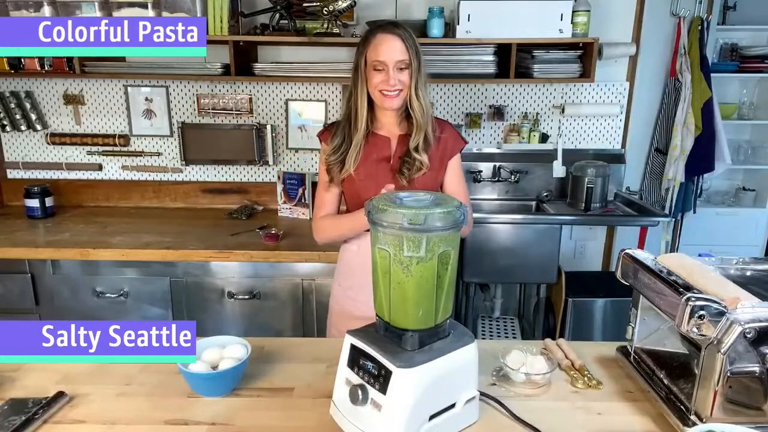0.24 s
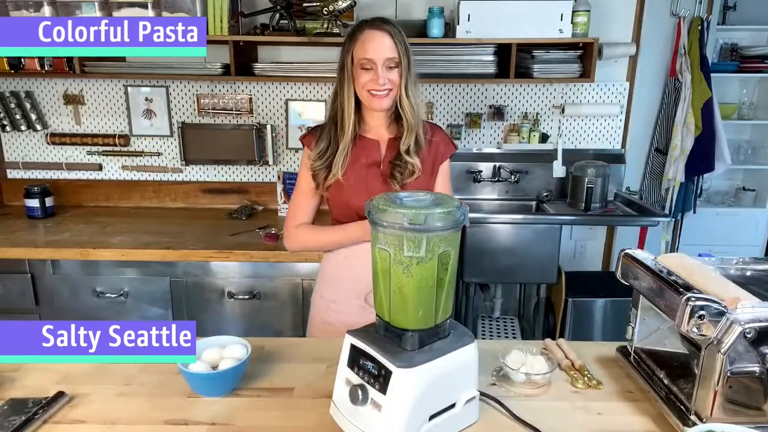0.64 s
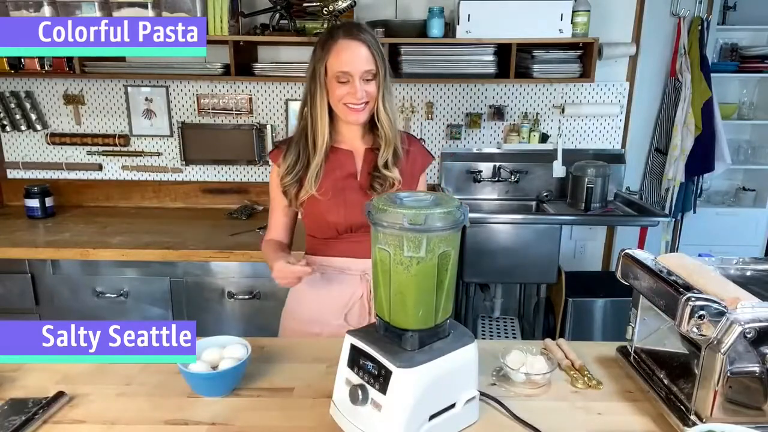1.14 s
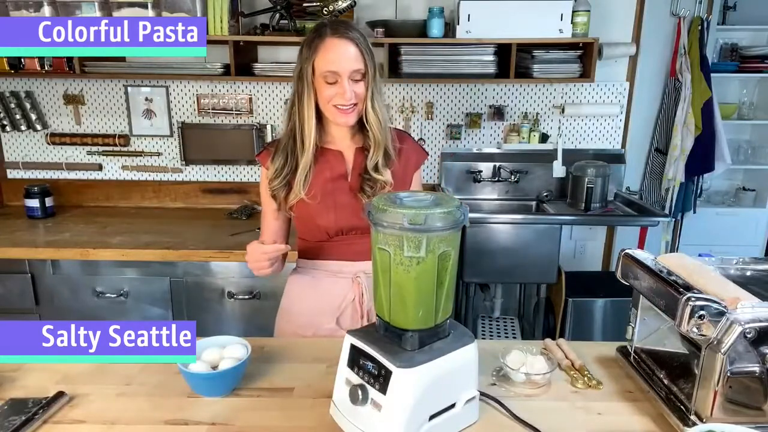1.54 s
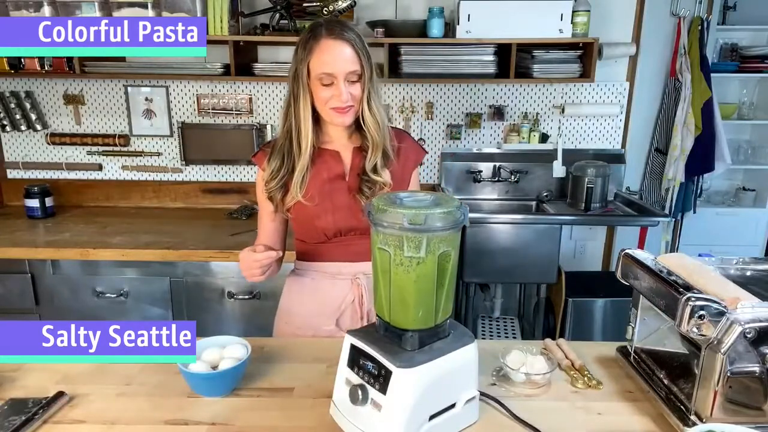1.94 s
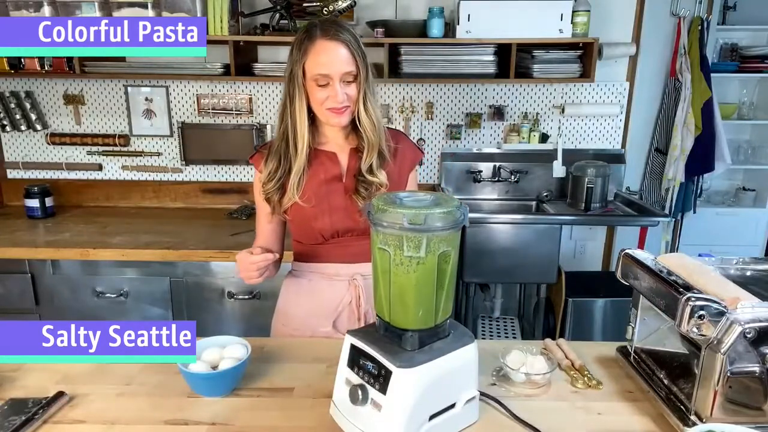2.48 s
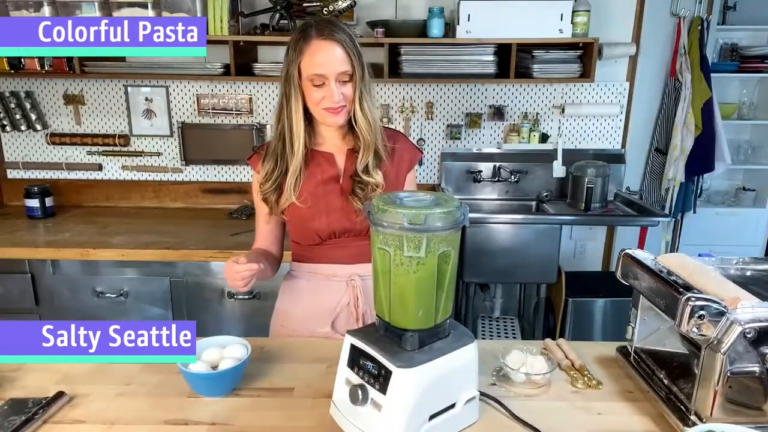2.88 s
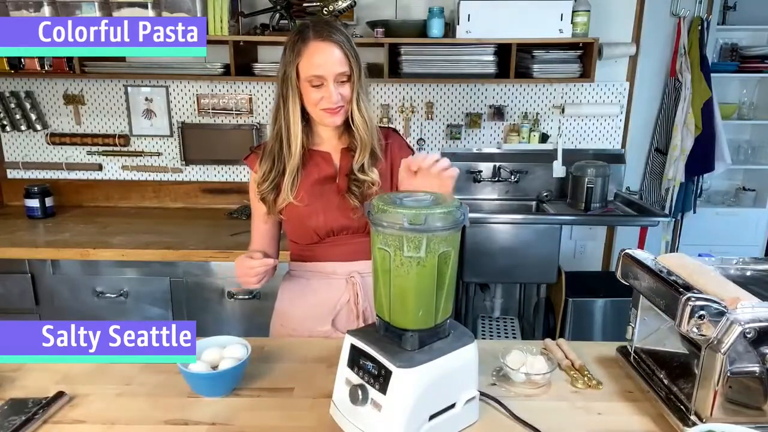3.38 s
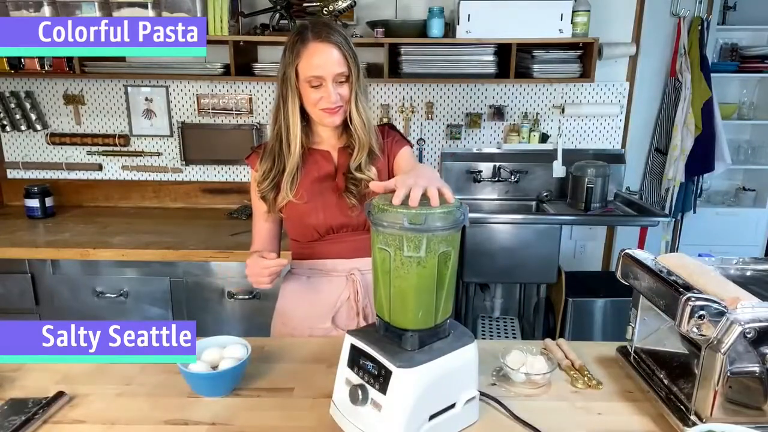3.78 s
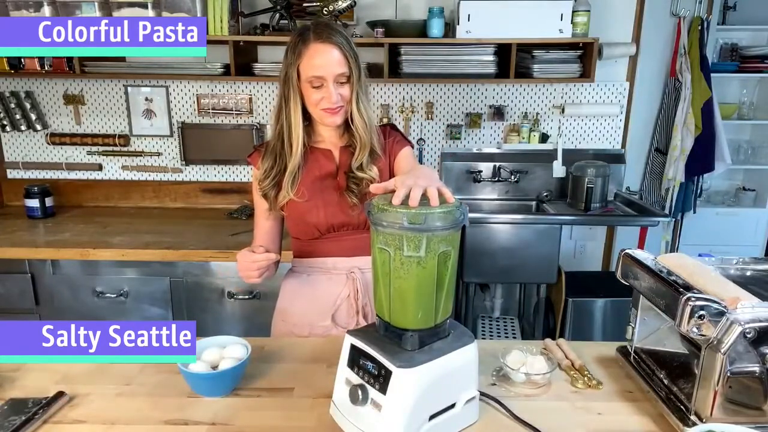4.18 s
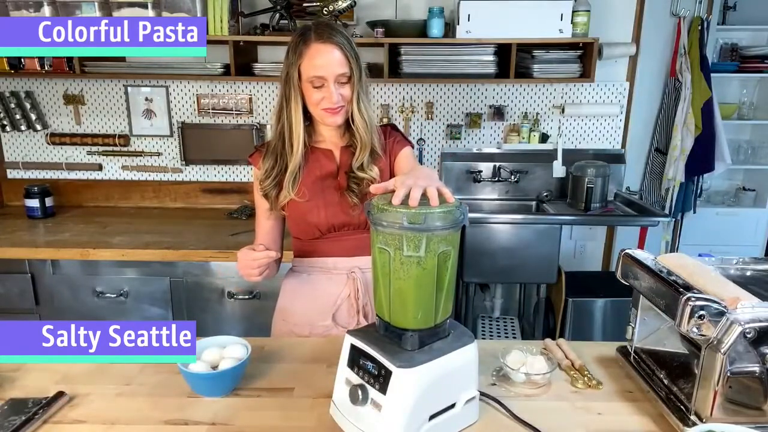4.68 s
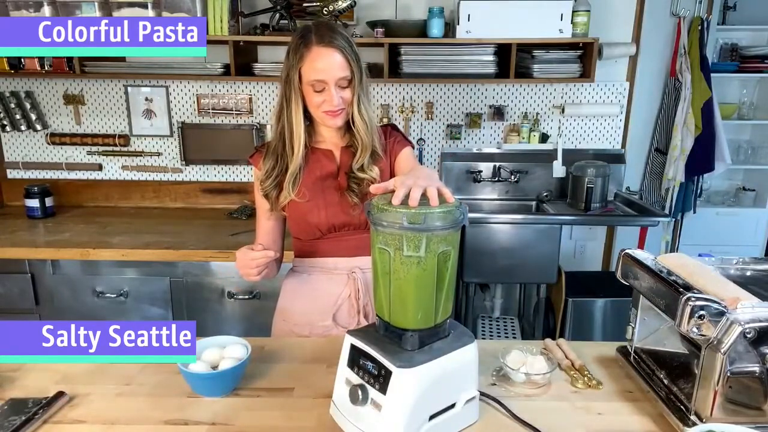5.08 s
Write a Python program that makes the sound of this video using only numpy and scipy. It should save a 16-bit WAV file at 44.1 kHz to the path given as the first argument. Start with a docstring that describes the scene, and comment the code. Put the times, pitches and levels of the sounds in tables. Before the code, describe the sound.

Faint and thin, a kitchen blender churns liquid from start to finish. Its airy motor hiss and two slight whines sit over soft sloshing, fizzing and quick bubbly blips. A few short splashes tick against the jug in the middle, then the mixture settles into a more even whir and hiss, with hardly any room sound.

```python
"""A kitchen counter: a jug blender runs flat out on a thin puree, faint and with almost no bass.
Bubbles collapsing behind the humming blade set the jug ringing, and the puree sloshes and fizzes.
The vortex gulps pockets of air that ring briefly; a few times a slug of puree splashes on the blade.
On top sit the hiss of fine spray, the motor's cooling air and two thin whines.
Later the puree turns smooth and the sound settles."""
import sys
import numpy as np
from scipy import signal
from scipy.fft import rfft, irfft
from scipy.io import wavfile

SR = 44100
rng = np.random.default_rng(int(sys.argv[2]) if len(sys.argv) > 2 else 0)


def wrap_up_sound(samples):
    """Save the sound to the file named by the first command line argument, as 16-bit audio."""
    columns = np.atleast_2d(samples).T
    # keep every value between -1 and 1, then stretch to whole-number steps
    tamed = np.clip(columns, -1, 1)
    steps = np.round(tamed * 32767).astype(np.int16)
    wavfile.write(sys.argv[1], SR, steps)


N = 234700
TIME = np.arange(N) / SR

# EQ curves of the noise layers: f/Hz, relative level/dB
ROOM_EQ = [(20, -9), (250, -7), (600, 10), (4000, -22), (9000, -28), (15000, -28)]
AIR_EQ = [(1200, -44), (2500, -4), (3000, 1.5), (3450, 4.5), (3800, 5), (4050, 0), (4300, -3.5), (4700, -2),
          (5200, -2.5), (6000, -4.5), (7000, -5.5), (7650, -21), (7950, -25.5), (8450, -26.5), (9050, -36),
          (9700, -54)]
SPRAY_EQ = [(3500, -27), (4600, -8), (5400, 1), (6000, 6.5), (6200, 1), (6450, 3), (6700, -4), (7000, -7.5),
            (7300, -10), (7700, -13), (7950, -29.5), (8400, -26), (9300, -50.5), (10500, -64.5)]
FIZZ_EQ = [(1800, -29), (2120, -6), (2220, 3.5), (2400, 2), (2470, -2.5), (2560, -0.5), (2750, -4.5),
           (3000, -18.5), (4000, -44.5)]
SLOSH_EQ = [(100, -32.5), (280, -19.5), (410, -19.5), (520, -8.5), (600, -12), (700, -7.5), (800, -9),
            (1000, -20), (1500, -49)]
SPLASH_EQ = [(250, -56), (420, -37), (620, -0.5), (780, -7.5), (950, 16), (1100, -1.5), (1250, 7.5),
             (1650, 9), (2000, -5.5), (2350, 9.5), (2800, -10), (3650, 5.5), (4300, -14), (6500, -43.5),
             (8000, -53), (10000, -73)]
THUD_EQ = [(25, -7.5), (110, -12), (300, -11.5), (600, -16)]
CHURN_EQ = [(300, -37.5), (600, -20.5), (780, -16), (880, -5.5), (1020, -0.5), (1130, -5), (1300, -1.5),
            (1600, 1), (1800, -1.5), (2000, -9.5), (2200, -9.5), (2700, -22.5), (4000, -52)]

# resonances: f/Hz, width/Hz, level within the layer/dB
HOUSING_MODES = [(3160, 70, -14), (3620, 90, -12), (3810, 70, -17), (4440, 80, -16), (6343, 65, -15)]  # whistles of the motor housing
FIZZ_MODES = [(2340, 68, -7.5), (2545, 78, -12.5)]  # the finest bubbles
GURGLE_MODES = [(1240, 99, -11), (1422, 150, 0.5), (1613, 41, -2.5), (1866, 210, -2)]  # small bubbles around an air pocket
FUNNEL_MODES = [(1415, 36, -13), (1504, 27, -14.5), (1575, 30, -11.5), (1730, 54, -21), (2036, 45, -14)]  # air funnel of the vortex, before its rise and sway
JUG_LOW_MODES = [(460.5, 19, -22), (565.2, 16, -9.5), (638.4, 20, -8.5)]  # body of the filled jug
JUG_HOLLOW_MODES = [(706.7, 31, -2.5), (762.5, 16, -3.5)]  # its hollow midrange
JUG_WALL_MODES = [(830.2, 19, -18.5), (958.6, 32, -18.5), (1016, 39, -27), (1255, 35, -13),
                  (1590, 27, -27.5), (1913, 53, -13)]  # its walls, and two further rings near 960 and 1255 Hz

# early reflections off the counter and the wall: delay/s, level/dB
REFLECTIONS = [(.0052, -23.5), (.0089, -23), (0.0133, -21.5)]
# fader of the cooling air: t/s, level/dB
AIR_FADER = [(0, -56), (0.45, -55), (0.8, -53.8), (1.3, -54), (1.9, -53), (2.25, -53), (2.5, -52.5),
             (2.8, -53.5), (3.2, -53), (3.5, -55), (3.65, -53.6), (4.4, -54), (4.85, -54), (5.32, -54)]
# faders of the motor's two whines: t/s, low whine/dB, high whine/dB
WHINE_FADERS = [(0, -73, -74), (0.45, -66.5, -73), (0.8, -61.5, -63), (1.3, -66, -80), (1.6, -64, -64),
                (2.4, -64, -62), (2.8, -53, -64), (3.5, -68, -67), (3.85, -58.5, -68), (4.13, -57, -70),
                (4.32, -71, -58.5), (4.48, -50, -67), (4.68, -59, -68), (4.8, -57, -75), (5.0, -61, -63),
                (5.32, -69, -71)]
# fader of the top hiss between sprays: t/s, level/dB
MIST_FADER = [(0, -59.5), (0.09, -58), (0.35, -61), (0.55, -57.5), (0.66, -64.5), (0.76, -59), (0.98, -63),
              (1.15, -60.5), (1.5, -61.5), (1.78, -58), (2.05, -61), (2.25, -63.5), (2.5, -64),
              (2.9, -58.5), (3.3, -59), (3.55, -60), (3.65, -58), (3.9, -57), (4.15, -58), (4.4, -58),
              (4.75, -58), (4.86, -62), (5.05, -58), (5.32, -64)]
# faders of the sloshing, which dies down overall: t/s, slosh/dB, hollow ring/dB
SLOSH_FADERS = [(0, -62, -65), (0.8, -60.5, -66.5), (1.25, -64.5, -64), (1.85, -61.5, -64.5),
                (2.3, -64, -70), (2.9, -69, -72.5), (3.55, -76, -69.5), (4.15, -75, -65), (4.7, -67.5, -73),
                (5.32, -78, -78.5)]
# fader of the churning and the blade's tone together: t/s, level/dB
CHURN_FADER = [(0, -49.5), (0.25, -51), (0.45, -49), (1.25, -49), (1.5, -51), (1.95, -46), (2.13, -45),
               (2.22, -47.5), (3.5, -49), (4.5, -48.5), (5.32, -48)]
# the blade's tone against the churning: t/s, hum (second harmonic)/dB, other harmonics/dB
BLADE_FADERS = [(0, -24, 2.5), (0.7, -21.5, -5), (1.0, -12, -8), (1.1, -5, 1), (1.18, -10.5, 2),
                (1.3, -6, -6), (1.4, -13, 5.5), (1.6, -9.5, -6), (1.7, -24, -2), (1.87, -2.5, -10),
                (1.94, -29, -7), (2.15, -7.5, 0), (2.28, -20, 3), (2.38, -5.5, -3.5), (2.55, -18.5, -3.5),
                (3.3, -18.5, 0), (3.5, -19.5, -3), (3.75, -19.5, 2.5), (3.92, -25, -6), (4.12, -24.5, 2.5),
                (4.27, -28.5, -3.5), (4.5, -20.5, -0.5), (4.8, -19, 0.5), (4.92, -28.5, -1),
                (5.32, -32, -0.5)]
# those other harmonics: multiple of the turning rate, level against their fader/dB
BLADE_HARMONICS = [(1, -41.5), (3, -12.5), (4, -11)]
# turning rate of the blade, sagging under load: t/s, f/Hz
BLADE_SPEED = [(0, 321), (0.28, 318), (0.4, 323), (0.65, 316), (0.8, 320), (0.92, 317.5), (1.07, 321),
               (1.28, 314.5), (1.42, 321), (1.58, 314.5), (1.7, 319), (1.86, 314), (2.02, 323), (2.17, 314),
               (2.32, 321.5), (2.6, 320), (2.78, 315), (2.9, 319), (3.02, 314.5), (3.28, 322), (3.55, 317),
               (3.8, 318), (3.96, 314), (4.35, 322.5), (4.85, 314), (5.0, 318), (5.32, 319.5)]

# bright sprays against the jug wall: t/s, level/dB, half length/s
SPRAY_CUES = [(0.24, -62, 0.022), (0.477, -63.5, 0.046), (2.062, -56.5, 0.025), (2.13, -57, 0.022),
              (2.344, -54, 0.031), (2.692, -56.5, 0.05), (2.847, -60, 0.018), (2.99, -55, 0.021),
              (3.23, -57, 0.025), (5.24, -58.5, 0.022)]
# puree slapping onto the blade: t/s, splash/dB, thud/dB, half length/s
SURGE_CUES = [(1.593, -50, -74, 0.01), (1.89, -47, -71.5, 0.016), (2.153, -35, -66, 0.012),
              (2.688, -47, -73, 0.018), (2.972, -48, -75, 0.045)]
# larger air pockets swallowed by the vortex: t/s, level before band-limiting/dB, f/Hz, decay/s
GULP_CUES = [(0.231,-38.5,1360,0.0036), (0.261,-35,1234,0.0048), (0.585,-46.5,1990,0.014),
             (0.665,-45,1520,0.025), (0.701,-34.5,1516,0.0058), (0.805,-35.5,2010,0.003),
             (0.83,-48,960,0.032), (0.869,-42,957,0.014), (0.923,-40,1270,0.0055), (1.042,-43,1270,0.0079),
             (1.075,-48.5,2317,0.027), (1.145,-43.5,1420,0.0079), (1.198,-39,1274,0.0065),
             (1.24,-46,960,0.027), (1.254,-31.5,1247,0.0061), (1.272,-44,1270,0.007),
             (1.408,-44,1360,0.005), (1.458,-38.5,1260,0.0081), (1.477,-35,1380,0.0022),
             (1.484,-32,1380,0.0022), (1.493,-31,1320,0.0022), (1.505,-43,1400,0.0054),
             (1.52,-35,1236,0.0053), (1.605,-43,2340,0.0071), (1.614,-30.5,1263,0.0058),
             (1.726,-39,1395,0.009), (1.76,-40,1630,0.005), (1.777,-32,1250,0.0058),
             (1.793,-36.5,1246,0.011), (1.818,-29,1272,0.0092), (1.862,-32,1243,0.0059),
             (1.874,-36,1250,0.0031), (1.876,-31,1635,0.006), (1.894,-33.5,1256,0.0098),
             (1.903,-44.5,2290,0.01), (1.943,-35.5,1650,0.0046), (1.965,-44.5,960,0.019),
             (2.0,-42.5,983,0.014), (2.029,-36.5,1230,0.003), (2.085,-44,1640,0.0069),
             (2.113,-35,1560,0.01), (2.133,-33,1300,0.012), (2.141,-28,1627,0.012), (2.245,-44,2340,0.0069),
             (2.284,-35,1490,0.0034), (2.34,-30,1257,0.0061), (2.394,-31.5,1850,0.0015),
             (2.421,-44.5,1660,0.011), (2.448,-37,1636,0.0063), (2.499,-28.5,1540,0.003),
             (2.505,-32.5,1280,0.0061), (2.525,-42,1520,0.0058), (2.642,-35.5,1244,0.0076),
             (2.652,-48,1290,0.0039), (2.688,-44,2380,0.0076), (2.72,-37.5,1240,0.0052),
             (2.806,-35.5,1620,0.0029), (2.867,-42,2350,0.0053), (2.938,-44.5,2420,0.012),
             (2.946,-42.5,1250,0.0058), (2.987,-30.5,1262,0.012), (2.99,-42.5,963,0.024),
             (3.009,-36,1242,0.013), (3.02,-35,1610,0.0038), (3.041,-38,1560,0.0014),
             (3.07,-38.5,1230,0.0081), (3.101,-32,1250,0.0054), (3.11,-42,1650,0.0042),
             (3.782,-46,1256,0.018), (3.892,-41,1250,0.027), (3.975,-48.5,1270,0.016),
             (4.096,-39,1263,0.01), (4.113,-50,1250,0.01), (4.23,-47.5,1296,0.014), (4.29,-47,1460,0.012),
             (4.31,-45,1265,0.016), (4.336,-38,1280,0.011), (4.89,-46,956,0.028)]
# the blender's level dips briefly: t/s, half length/s, depth/dB
DIP_CUES = [(0.953, 0.0063, -16), (2.544, 0.0084, -10)]

SMOOTHING_S, UNREST_LEFT = [3.0, 3.5], .5  # the puree turns smooth; share of the unsteadiness that stays
SLOSH_REF_DB, AIR_REF_DB = -57.5, -54  # fader settings that count as zero for the layers following them


def from_db(db):
    """Decibels to gain."""
    return 10 ** (np.asarray(db) / 20)


def rms_one(x):
    """Scale to unit power."""
    return x / np.sqrt(np.mean(x ** 2) + 1e-20)


def automation(rows):
    """Each column of a breakpoint table as a curve at every sample."""
    times, *columns = np.transpose(rows)
    return [np.interp(TIME, times, column) for column in columns]


def drift(rate_hz):
    """Smooth random modulation up to about this rate; unit power."""
    hz = np.arange(N // 2 + 1) * SR / N
    return rms_one(irfft(rfft(rng.standard_normal(N)) / (1 + (hz / rate_hz) ** 2), N))


def equalised(x, curve):
    """Shape a signal with an EQ curve, rolling off steeply above its last point; unit power."""
    hz, db = np.transpose(curve)
    bins = np.maximum(np.arange(N // 2 + 1) * SR / N, 1)
    gain = from_db(np.interp(np.log(bins), np.log(hz), db)) / (1 + (bins / hz[-1] / 2) ** 8)
    return rms_one(irfft(rfft(x) * gain, N))


def noise(curve):
    """Noise coloured by an EQ curve; unit power."""
    return equalised(rng.standard_normal(N), curve)


def resonances(x, modes):
    """Parallel resonators, each applied twice so that the valleys stay dark."""
    out = 0
    for hz, width_hz, db in modes:
        r = np.exp(-2 * np.pi * width_hz / SR * np.sqrt(.5))
        section = [1 - r, 0, r - 1, 1, -2 * r * np.cos(2 * np.pi * hz / SR), r * r]
        out = out + from_db(db) * rms_one(signal.sosfilt([section, section], x))
    return out


def collapses(per_s, spread_db):
    """A dense crackle of tiny bubble collapses of uneven size."""
    born = rng.random(N) < per_s / SR
    return born * rng.standard_normal(N) * from_db(spread_db * rng.standard_normal(N))


def room_tone(level_db=-78):
    """A faint, steady bed of noise under everything."""
    return from_db(level_db) * noise(ROOM_EQ)


def with_reflections(x):
    """The counter and the wall throw back faint, early copies that ripple the hiss."""
    return x + sum(from_db(db) * np.roll(x, round(delay * SR)) for delay, db in REFLECTIONS)


def cooling_air(trim_db=-0.92, flicker_db=0.84):
    """The motor fan blows an even hiss with faint whistles through the housing."""
    hiss = from_db(trim_db + flicker_db * drift(24)) * noise(AIR_EQ)
    return hiss + resonances(rng.standard_normal(N), HOUSING_MODES)


def whine(hz, wander, throb_db):
    """A thin motor tone that flutters in pitch and strength."""
    pitch = hz * (1 + wander * drift(30))
    throb = from_db(throb_db * np.clip(drift(31), -2, 1))
    return rms_one(np.sin(2 * np.pi * np.cumsum(pitch) / SR) * throb)


def motor(air_db):
    """The motor's cooling air, with two whines that swell and fade."""
    low_db, high_db = automation(WHINE_FADERS)
    low = from_db(low_db) * whine(hz=1647, wander=.0024, throb_db=7.5)
    high = from_db(high_db) * whine(hz=3608, wander=.0034, throb_db=3.0)
    return from_db(air_db) * with_reflections(cooling_air()) + low + high


def sprays(flutter_db=1.7):
    """Fine drops thrown at the jug wall make a fluttering top hiss that swells with each spray."""
    mist_db, = automation(MIST_FADER)
    power = from_db(mist_db) ** 2
    for at, db, length in SPRAY_CUES:
        power += from_db(db) ** 2 * np.exp(-((TIME - at) / length) ** 2)
    return np.sqrt(power) * from_db(flutter_db * drift(45)) * noise(SPRAY_EQ)


def fizzing(agitation_db, air_db, unrest, base_db=-55, lumpy_db=2.0):
    """The finest bubbles burst in flurries; their level rides the air fader and, a little, the slosh."""
    level_db = base_db + 0.1 * agitation_db + 1.1 * (air_db - AIR_REF_DB)
    bursts = equalised(collapses(per_s=8900, spread_db=-0.5), FIZZ_EQ)
    ring = resonances(rng.standard_normal(N), FIZZ_MODES)
    flurries = from_db(lumpy_db * unrest * drift(21))
    return from_db(level_db) * rms_one((bursts + ring) * flurries)


def sloshing(slosh_db, hollow_db, wash_db=-14.0):
    """The circling puree excites the jug's low resonances; the hollow pair has its own fader."""
    wash = from_db(wash_db) * noise(SLOSH_EQ)
    body = wash + resonances(collapses(per_s=2100, spread_db=3.0), JUG_LOW_MODES)
    hollow = resonances(collapses(per_s=2500, spread_db=4.0), JUG_HOLLOW_MODES)
    return from_db(slosh_db) * body + from_db(hollow_db) * hollow


def surges():
    """A slug of puree hits the blade: a short, broad splash with a faint thud through the counter."""
    splash, thud = np.zeros((2, N))
    for at, splash_db, thud_db, length in SURGE_CUES:
        swell = np.exp(-.5 * ((TIME - at) / length) ** 2)
        splash += from_db(splash_db) * swell
        thud += from_db(thud_db) * swell
    return splash * noise(SPLASH_EQ) + thud * noise(THUD_EQ)


def small_gulp_cues(agitation_db, tries=100, level_db=-45.5, hz=1322, spread_oct=0.36, decay_s=0.0094):
    """Small air pockets form at random, more often the harder the puree sloshes."""
    cues = []
    for when, chance, size, pitch in zip(*rng.random((2, tries)), *rng.standard_normal((2, tries))):
        per_s = 8 * from_db(2.2 * agitation_db[int(when * N)])
        if chance < per_s * TIME[-1] / tries:
            cues.append((when * TIME[-1], level_db + size, hz * 2 ** (spread_oct * pitch), decay_s))
    return cues


def gulps(agitation_db, turns_hz, unrest, chop=0.13, gurgle_db=-18, gurgle_s=0.021, lag_s=0.0084):
    """Each air pocket swells into a blip, chopped by the blade, and collapses in a gurgle of bubbles."""
    blips, gurgle_power = np.zeros((2, N))
    wobble = 0.28 * drift(330) + 2 * np.pi * rng.random()
    rasp_db = 2.0 * np.clip(drift(200), -2, 1.5)
    for at, db, hz, decay in list(GULP_CUES) + small_gulp_cues(agitation_db):
        near = np.abs(TIME - at) < .06
        t = TIME[near] - at
        width = decay * np.where(t < 0, .8, 1)  # the attack is a little quicker than the decay
        rasp = from_db(rasp_db[near] * min(decay / 0.011, 1))  # longer pockets are raspier
        envelope = np.exp(-(t / width) ** 2) * rasp
        blips[near] += from_db(db) * envelope * np.sin(2 * np.pi * hz * t + wobble[near])
        gurgle_power[near] += from_db(db) ** 2 * np.exp(-((t - lag_s) / gurgle_s) ** 2)
    blips *= 1 + chop * np.sin(2 * np.pi * np.cumsum(turns_hz) / SR + drift(40))
    bubbles = rms_one(resonances(collapses(per_s=2200, spread_db=-2.5), GURGLE_MODES))
    gurgle = from_db(gurgle_db) * unrest * np.sqrt(gurgle_power) * bubbles
    # the pockets' sound is kept to a band from 750 Hz to 2.7 kHz
    band = signal.butter(4, [750, 2700], "band", fs=SR, output="sos")
    return signal.sosfilt(band, blips + gurgle)


def funnel(rise=.009, sway=.006):
    """Collapses ring the vortex's air funnel; its pitch sways, and creeps up as the puree thins."""
    ring = resonances(collapses(per_s=10000, spread_db=0.0), FUNNEL_MODES)
    varispeed = 1 + rise * TIME / TIME[-1] + sway * drift(2.95)
    return np.interp(np.cumsum(varispeed) % N, np.arange(N), ring)


def blade(turns_hz, unrest, wander=0.001435, flutter=0.0118, throb_db=6.0):
    """The blade's harmonics waver in pitch and strength as its load changes."""
    hum_db, harmonics_db = automation(BLADE_FADERS)
    partials = [(multiple, db + harmonics_db) for multiple, db in BLADE_HARMONICS] + [(2, hum_db)]
    speed = turns_hz * (1 + wander * drift(3.67) + unrest * flutter * drift(37.6))
    angle = 2 * np.pi * np.cumsum(speed) / SR
    out = 0
    for multiple, db in partials:
        tone = np.sin(multiple * (angle + 0.14 * drift(2.9)))
        throb = from_db(throb_db * np.clip(drift(21), -2, 1))
        out = out + from_db(db) * rms_one(tone * throb)
    return out


def churning(unrest, wash_db=-4.0, lumpy_db=1.46):
    """Bubbles collapse behind the blade and set the jug walls and the air funnel ringing."""
    wash = from_db(wash_db) * equalised(collapses(per_s=16000, spread_db=1.5), CHURN_EQ)
    walls = resonances(collapses(per_s=9700, spread_db=-0.5), JUG_WALL_MODES)
    return (wash + walls + funnel()) * from_db(lumpy_db * unrest * drift(9.2))


def scene():
    """The mono mix: all blender layers, dipping briefly twice, over the room tone."""
    slosh_db, hollow_db = automation(SLOSH_FADERS)
    churn_db, = automation(CHURN_FADER)
    air_db, = automation(AIR_FADER)
    turns_hz, = automation(BLADE_SPEED)
    unrest = np.interp(TIME, SMOOTHING_S, [1, UNREST_LEFT])
    agitation_db = slosh_db - SLOSH_REF_DB
    blender = from_db(churn_db) * (churning(unrest) + blade(turns_hz, unrest))
    blender += sloshing(slosh_db, hollow_db) + fizzing(agitation_db, air_db, unrest)
    blender += gulps(agitation_db, turns_hz, unrest) + surges()
    blender += with_reflections(sprays()) + motor(air_db)
    dip_db = sum(db * np.exp(-(np.abs(TIME - at) / length) ** 3) for at, length, db in DIP_CUES)
    return (blender * from_db(dip_db) + room_tone())[None]


def record(dry, cutoff_hz=15400):
    """A steep high cut on the whole mix."""
    return signal.sosfilt(signal.ellip(10, .1, 70, cutoff_hz, fs=SR, output="sos"), dry)


dry = scene()
out = record(dry)
wrap_up_sound(out)
```